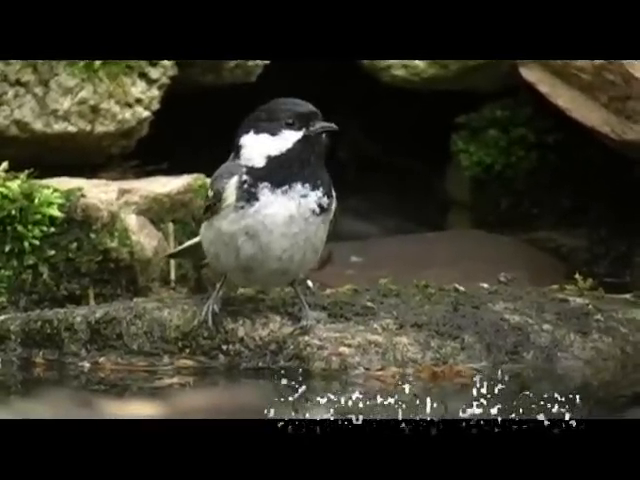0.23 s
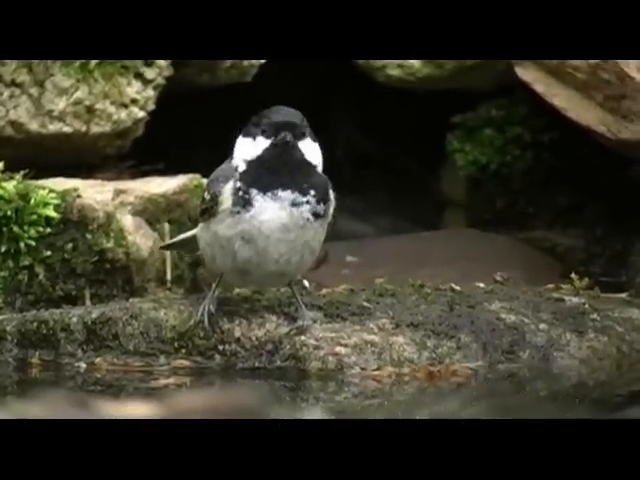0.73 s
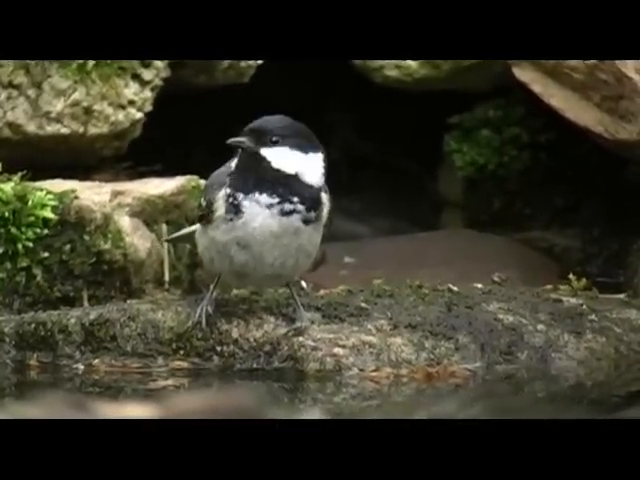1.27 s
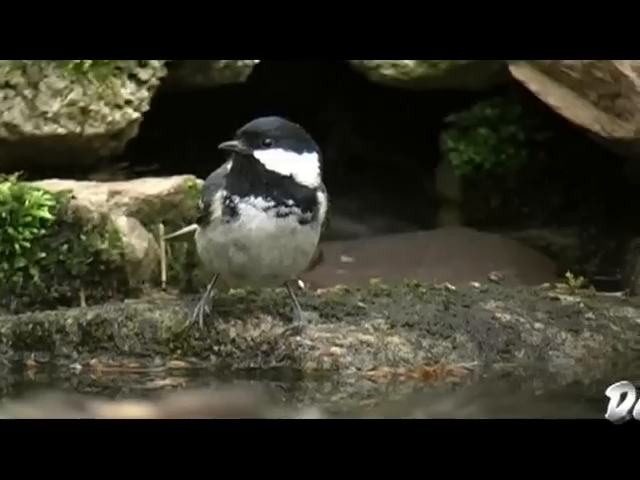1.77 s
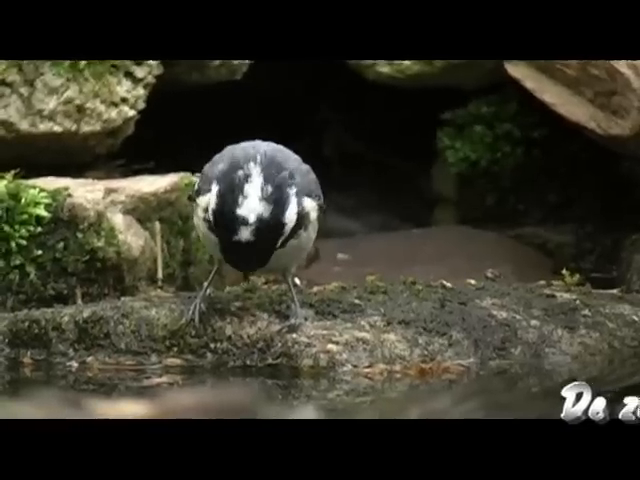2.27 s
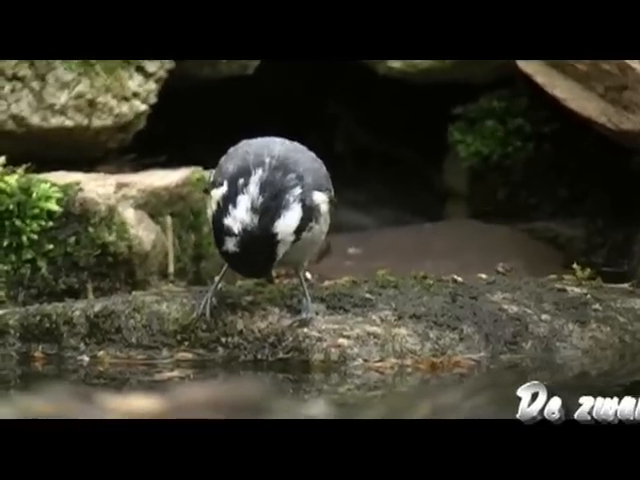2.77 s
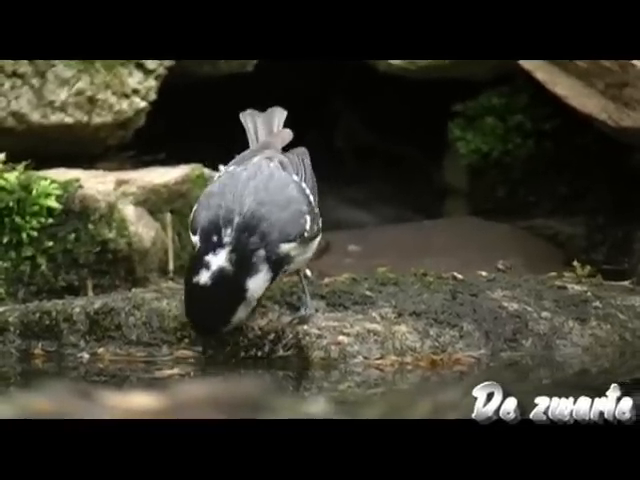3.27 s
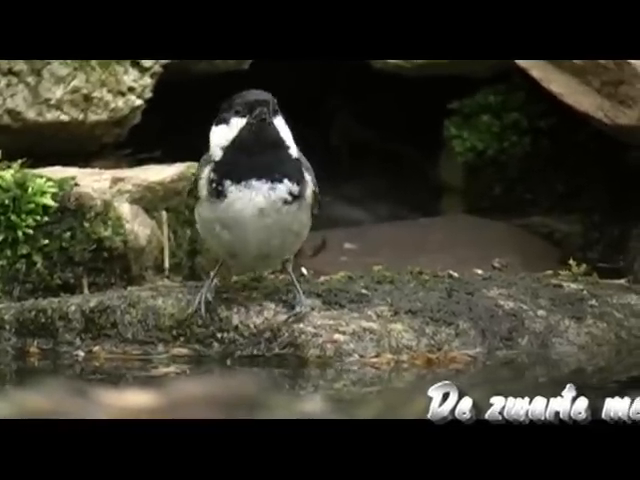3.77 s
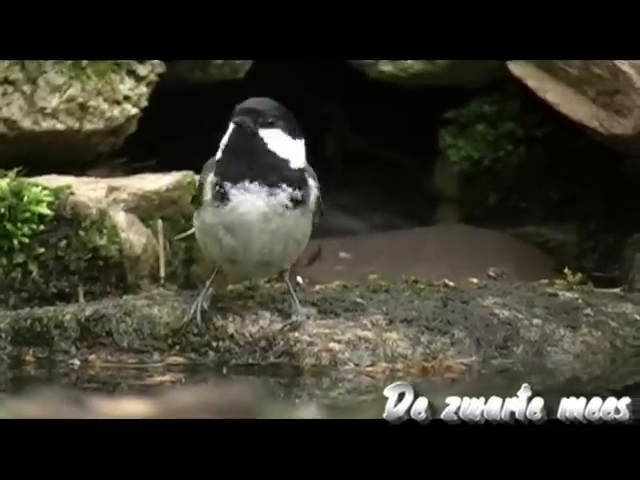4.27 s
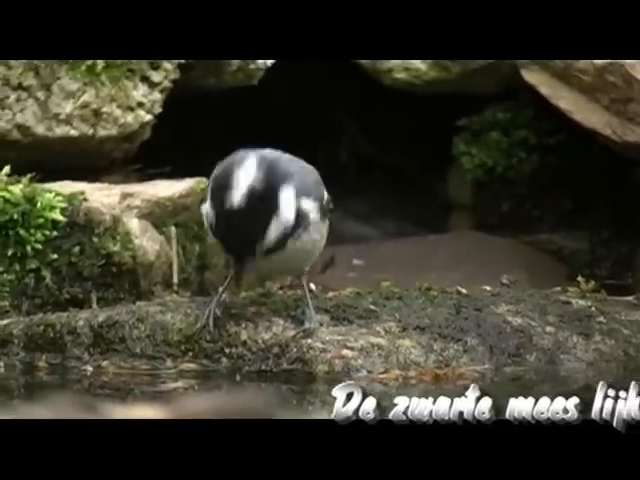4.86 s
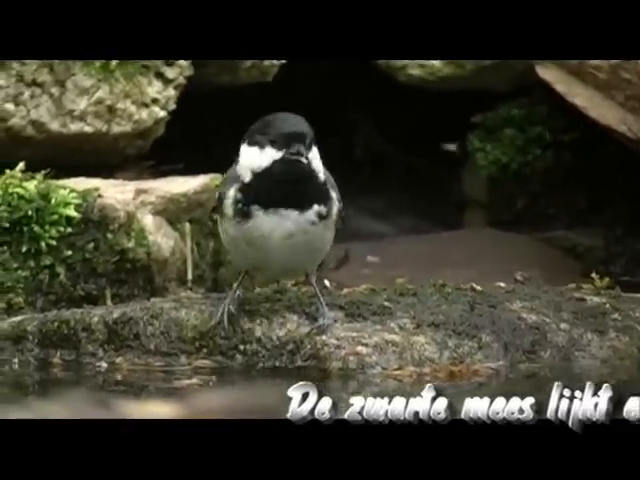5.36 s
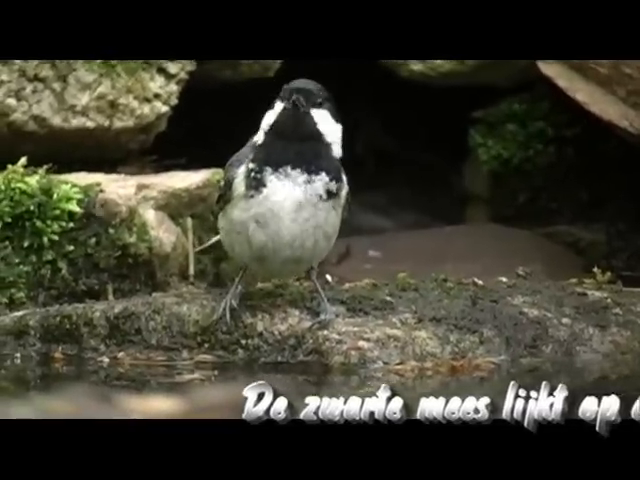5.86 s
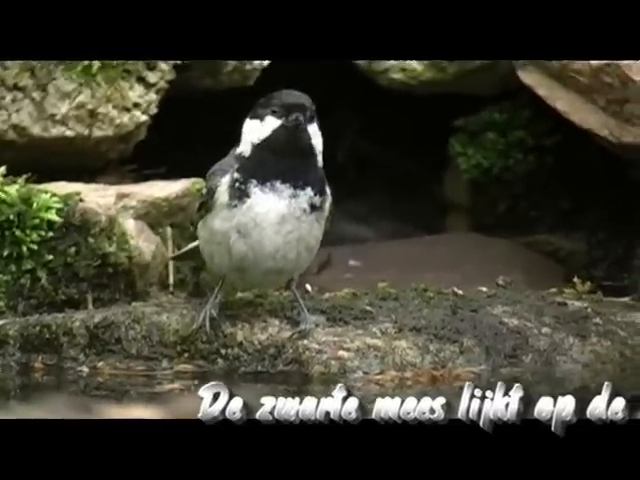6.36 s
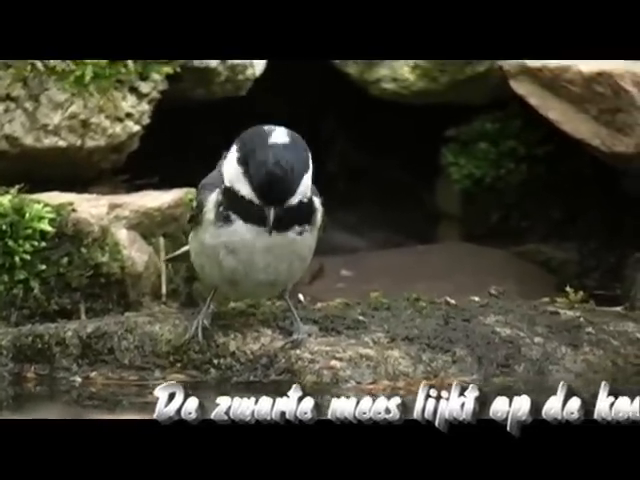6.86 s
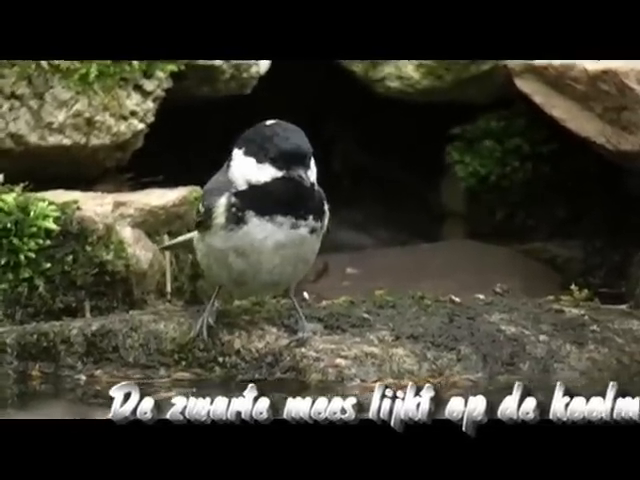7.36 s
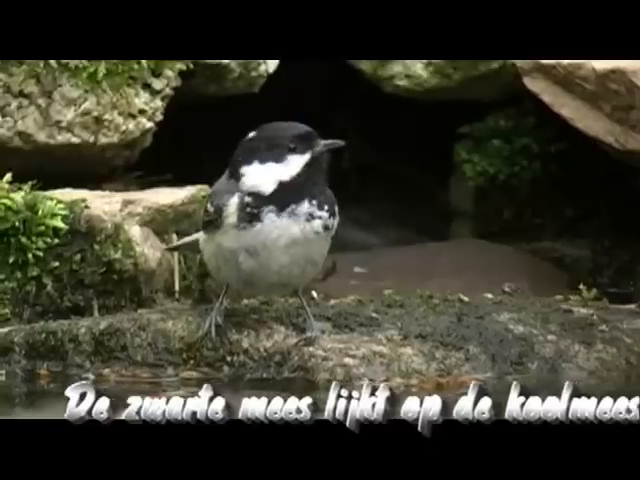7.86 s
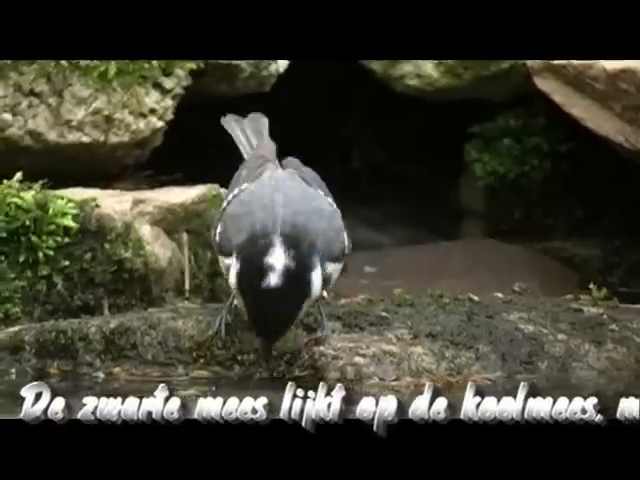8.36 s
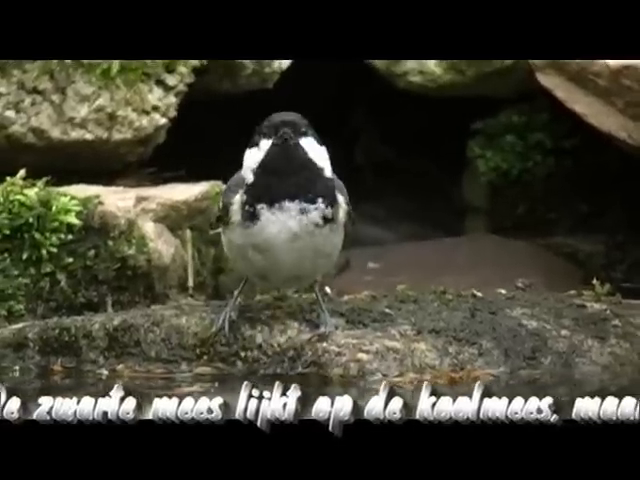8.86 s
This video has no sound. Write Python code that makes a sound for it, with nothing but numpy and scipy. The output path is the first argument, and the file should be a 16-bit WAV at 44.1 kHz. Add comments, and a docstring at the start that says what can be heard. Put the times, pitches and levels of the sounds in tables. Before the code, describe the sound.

Close, high two-note birdsong comes twice in a garden, amid fluty warbles, distant chirps, far traffic rumble and a steady motor hum.

```python
"""A coal tit sings close by in a garden: two runs of alternating low slurs and high whips, each note
repeated by a fading echo off a wall. A blackbird warbles, a chiffchaff calls and other small birds
chirp and trill further off, washed out by the trees. Every bird note is a tone gliding along a contour.
Under them lies a bed of far traffic rumble, steady motor hum and soft hiss; something knocks once."""
import sys
import numpy as np
from scipy import signal
from scipy.fft import rfft, irfft
from scipy.io import wavfile
from scipy.ndimage import uniform_filter1d

SR = 44100
rng = np.random.default_rng(int(sys.argv[2]) if len(sys.argv) > 2 else 0)


def pcm_store(signal):
    """Save signal as 16-bit PCM."""
    levels = np.round(np.clip(np.atleast_2d(signal), -1, 1) * 32767)
    wavfile.write(sys.argv[1], SR, levels.astype(np.int16).T)


N = 401751
TIME = np.arange(N) / SR


def gain_of(db):
    """Decibels to amplitude."""
    return 10 ** (np.asarray(db) / 20)


def curve_at(points, hz):
    """Reads a curve on a log-frequency axis."""
    point_hz, value = np.transpose(points)
    return np.interp(np.log(hz + 1), np.log(point_hz + 1), value)


def add(mix, start_s, sound):
    """Mixes a sound onto a track."""
    part = mix[max(round(start_s * SR), 0):][:len(sound)]
    part += sound[:len(part)]


def drift(t, hz):
    """A smooth random wobble of unit size, moving at rates up to hz."""
    rates = np.geomspace(hz / 4, hz, num=10)[:, None]
    return np.sin(2 * np.pi * (rates * t + rng.random(rates.shape))).sum(0) / np.sqrt(5)


def note(start_s, length_s, start_hz, middle_hz, end_hz, level_db, peak_at, *warble, fade_db):
    """A note's contour: pitch arcs; level and any warble peak at the fraction peak_at of its length."""
    progress = np.linspace(0, 1, num=25)
    arc = np.polyfit([0, .5, 1], [start_hz, middle_hz, end_hz], 2)
    peak_at = np.clip(peak_at, .02, .98)
    off_peak = np.maximum(1 - progress / peak_at, (progress - peak_at) / (1 - peak_at))
    shape_db = fade_db * off_peak ** 1.5
    contour = [start_s + length_s * progress, np.polyval(arc, progress), level_db + shape_db]
    return np.transpose(contour + [depth * gain_of(shape_db) for depth in warble])


def repeated(contours, cues):
    """The same notes sung again at each cue, at its own level."""
    return [c + np.array([s, 0, db, 0])[:c.shape[1]] for s, db in cues for c in contours]


def tone(contour, jitter, warble_rate_hz):
    """A sine gliding along rows of time, pitch, level and optional warble depth; gives start and sound."""
    times, *columns = np.transpose(contour)
    t = np.arange(times.min(), times.max(), 1 / SR)
    hz, db, *depth = (uniform_filter1d(np.interp(t, times, c), size=130) for c in columns)
    hz = hz * (1 + jitter * drift(t, 220))
    if depth:
        # the warble is uneven in speed and depth, and the level flutters with it
        rate_hz = warble_rate_hz * (1 + .15 * drift(t, 35))
        swing = np.sin(2 * np.pi * np.cumsum(rate_hz) / SR)
        hz = hz + depth[0] * swing * gain_of(-2 + 1.8 * drift(t, 40))
        db = db + 1.2 * drift(t, 55)
    fades = signal.windows.tukey(len(t), min(0.0023 * SR / len(t), 1))
    return t[0], np.sqrt(2) * gain_of(db) * fades * np.sin(2 * np.pi * np.cumsum(hz) / SR)


def phrase(contours, jitter, warble_rate_hz=0.):
    """All the notes of one voice on one track; more pitch jitter makes it hoarser."""
    track = np.zeros(N)
    for contour in contours:
        add(track, *tone(contour, jitter, warble_rate_hz))
    return track


def reverb(x, t60, spread, treble_share=0.067):
    """Reflections from stones and foliage: a dying cloud of taps, partly different left and right."""
    t = np.arange(SR) / SR
    taps = rng.choice([-1., 1.], (3, SR)) * (rng.random((3, SR)) < 1 / 10) * (t > .001)
    bright = signal.filtfilt(*signal.butter(2, 6300, "high", fs=SR), taps)
    # the air takes the high treble first
    taps = (taps - bright) * gain_of(-60 * t / t60) + bright * gain_of(-60 * t / (treble_share * t60))
    tails = taps[:2] * spread + taps[2]
    tails /= np.linalg.norm(tails, axis=1, keepdims=True)
    return signal.fftconvolve(x[None], tails, axes=1)[:, :N]


# how alike left and right are in the bed: frequency_hz, correlation
BED_CORRELATION = [(20, .5), (45, 0.87), (130, 0.88), (300, 1), (370, 0.5), (430, 0.7), (700, 0.26),
                   (1500, 0.01), (4500, 0.56), (9000, 0.46), (15000, 0.33)]
def noise_bed(spectrum):
    """Coloured stereo noise at unit rms, near mono in the bass and diffuse above."""
    hz = np.fft.rfftfreq(N, 1 / SR)
    left, other = rfft(rng.standard_normal((2, N)))
    alike = curve_at(BED_CORRELATION, hz)
    right = alike * left + np.sqrt(1 - alike ** 2) * other
    noise = irfft(np.array([left, right]) * gain_of(curve_at(spectrum, hz)), N)
    return noise / np.sqrt(np.mean(noise ** 2))


# EQ of the hiss: frequency_hz, gain_db
AIR_EQ = [(300, 5.5), (800, 2), (1500, 1.5), (2700, -1.5), (4500, -1), (6000, -4), (8000, -9),
          (11000, -9.5), (15500, -12.5)]
def air():
    """The soft, steady hiss of the open air."""
    return gain_of(-46.5) * noise_bed(AIR_EQ)


# EQ of the rumble: frequency_hz, gain_db
TRAFFIC_EQ = [(18, -28), (40, -5.5), (60, 3.5), (90, -5.5), (112, -4.5), (132, 7.5), (170, 3.5), (225, 2),
              (315, -8), (355, -1.5), (410, -9.5), (500, -7.5), (700, -16), (1500, -37.5)]
# vehicle pass-bys: peak_s, half_width_s, level_db
PASS_BYS = [(.1, 0.42, -50.5), (2.5, 0.88, -42.5), (3.65, 0.34, -39.5), (4.6, 0.3, -39.5),
            (5.75, 0.34, -47), (8.9, 0.92, -50.5)]
def traffic():
    """A far, steady rumble; each vehicle adds its power as it nears and leaves."""
    steady_power = gain_of(-48.5) ** 2
    passing_power = sum(gain_of(db) ** 2 * np.exp(-((TIME - s) / width) ** 2) for s, width, db in PASS_BYS)
    swell_db = 10 * np.log10(steady_power + passing_power)
    rumble = noise_bed(TRAFFIC_EQ)
    # the deep rumble comes from all around and swells less
    deep = signal.filtfilt(*signal.butter(2, 100, fs=SR), rumble)
    return gain_of(swell_db + 3.5) * (rumble - deep) + gain_of(-27 + 0.31 * swell_db) * deep


# hum and whine tones: pitch_hz, level_db, left_lead_rad
HUM_TONES = [(151.8, -34.5, 2.5), (610, -59, 3.5), (15623, -81, -5)]
def motor_hum():
    """A steady motor hum and a thin electrical whine, wavering slightly in phase."""
    hum = np.zeros((2, N))
    for hz, db, left_lead in HUM_TONES:
        phase = 2 * np.pi * hz * TIME + .06 * drift(TIME, 3.1)
        hum += np.sqrt(2) * gain_of(db) * np.sin([phase + left_lead, phase])
    return hum


# engine drones: start_s, length_s, start_hz, middle_hz, end_hz, level_db, peak_at
ENGINE_DRONES = [(1.1, 1.45, 225, 258, 316, -43, 0.5), (2.05, 1.27, 140.1, 142.3, 145, -35, 0.3),
                 (2.8, 1.53, 142.1, 156.8, 148.4, -37, 0.5), (4.55, 1.19, 143.6, 141, 137.9, -36.5, 0.6),
                 (8.15, 0.77, 134.2, 132.6, 136.7, -42, 0)]
def far_engines():
    """Rough drones that swell and fade; the low ones beat with the hum."""
    return gain_of(-4.5) * phrase([note(*row, fade_db=-5.5) for row in ENGINE_DRONES], jitter=0.11)


# ring of the wood: pitch_hz, level_db, t60_s
WOOD_MODES = [(413, -20, 0.03), (497, -35, 0.037), (915, -33, .03), (1300, -35, 0.032), (1560, -32, 0.02)]
def knock():
    """A dull double contact on wood, with two faint bounces."""
    t = np.arange(SR // 5) / SR
    ring = sum(gain_of(db - 60 * t / t60) * np.sin(2 * np.pi * hz * t) for hz, db, t60 in WOOD_MODES)
    ring *= 1 - np.exp(-(t / 0.00053) ** 2)  # a soft contact
    hits = np.zeros(N)
    for start_s, level_db in [(6.2092, -15), (6.2125, 0.5), (6.228, -26), (6.247, -14.5)]:
        add(hits, start_s, gain_of(level_db) * ring)
    return hits + gain_of(-9) * reverb(hits, t60=0.075, spread=2.4)


# one burst of twitter: offset_s, length_s, start_hz, middle_hz, end_hz, level_db, peak_at
TWITTER_NOTES = [(0.0047, 0.076, 2900, 4100, 5000, -39.5, .8), (0.057, .11, 4550, 4350, 4150, -37.5, .15),
                 (0.0087, .06, 5600, 2800, 6400, -44, 0), (.06, 0.037, 6980, 6900, 6780, -37, 0.4),
                 (0.12, 0.043, 6550, 6500, 6400, -45, 0.8)]
# its two cues: start_s, level_db
TWITTER_CUES = [(4.495, -1), (4.733, -8.5)]
# single chirps and scratchy notes: start_s, length_s, start_hz, middle_hz, end_hz, level_db, peak_at
CHIRP_NOTES = [(2.225, 0.101, 3100, 4220, 4200, -52, 0.13), (2.193, 0.074, 2600, 3270, 3200, -63, .45),
               (5.23, 0.15, 3000, 3920, 5100, -42.5, 0.96), (6.017, 0.05, 4500, 4150, 3800, -48.5, 0.4),
               (5.223, .13, 2400, 2100, 1850, -60, 0), (5.772, 0.64, 2240, 2120, 2100, -64, 0),
               (8.582, 0.061, 4230, 4500, 4490, -49.5, .5), (8.583, 0.0677, 3620, 3500, 3400, -52, 0.3),
               (8.872, 0.073, 2750, 2700, 4000, -53.5, 0), (8.932, 0.044, 5230, 5260, 5200, -53, 0)]
SCRATCH_NOTES = [(.3, .1, 4190, 3900, 3700, -49, 0), (1.396, .6, 5310, 5110, 4740, -48, 0.52),
                 (2.177, 0.088, 4470, 3760, 3270, -38.5, 0), (3.991, 0.35, 3494, 3200, 3365, -41, 0.24),
                 (4.355, .55, 3294, 3296, 2890, -40, 0.18), (4.484, .16, 5010, 5530, 5380, -32, 0),
                 (4.754, 0.14, 5190, 5280, 5080, -36, 0), (4.496, .18, 9900, 10300, 10400, -45, .45),
                 (4.76, .17, 10400, 10600, 10600, -59, .5), (8.299, .25, 4340, 3820, 2960, -43.5, 0),
                 (8.6, 0.44, 3300, 3430, 3560, -46.5, 0.62)]
def far_birds():
    """Slightly hoarse twitters and chirps and very hoarse scratches, smeared by the trees."""
    twitter = repeated([note(*row, fade_db=-8.5) for row in TWITTER_NOTES], TWITTER_CUES)
    chirps = [note(*row, fade_db=-8.5) for row in CHIRP_NOTES]
    song = phrase(twitter + chirps, jitter=.013)
    scratches = phrase([note(*row, fade_db=-12) for row in SCRATCH_NOTES], jitter=0.11)
    wet_song = gain_of(-8.5) * song + reverb(song, t60=.7, spread=.28)
    return gain_of(4) * wet_song + gain_of(-4) * reverb(scratches, t60=1.0, spread=0.54)


# thin whistles: start_s, length_s, start_hz, middle_hz, end_hz, level_db, peak_at
WHISTLE_NOTES = [(0, 0.028, 8220, 8100, 7800, -43, 0), (0.05, .05, 7980, 8180, 8050, -48, 0.4),
                 (0.14, .05, 7850, 8080, 8100, -57, .5), (0.057, .055, 6500, 4630, 3700, -54, 0.8),
                 (.825, .065, 7140, 7720, 7100, -60, .6), (1.0, 0.12, 3410, 3490, 3520, -53.5, 0.15),
                 (1.153, 0.21, 3490, 3640, 3630, -54.5, 0), (.83, .09, 4900, 4950, 5000, -62, .5),
                 (1.3, 0.12, 5180, 5050, 4800, -58, .6), (7.049, 0.072, 3170, 3180, 3280, -52.5, 0.8),
                 (7.665, 0.13, 3990, 3990, 3945, -40.5, 1), (9.003, 0.025, 3290, 3620, 3030, -44.5, 0.95),
                 (9.08, 0.039, 3170, 3470, 3700, -48, 0.9)]
# trills: start_s, level_db
TRILL_CUES = [(7.941, -43), (8.14, -44.5), (8.343, -45)]
def small_birds():
    """Nearer birds: thin whistles, and trills of tiny falling slurs, each run led by an upward slur."""
    song = phrase([note(*row, fade_db=-15) for row in WHISTLE_NOTES], jitter=0.0054)
    trill_rate_hz = 78
    for s, db in TRILL_CUES:
        lead_in = [(s - .04, 3350, db - 10), (s - .02, 3750, db), (s, 4200, db + 0.5)]
        slurs = [[(at, 3600, db - 20), (at + 0.005, 3250, db + 3.5), (at + 0.011, 3000, db - 16)]
                 for at in s + np.arange(9) / trill_rate_hz]
        song += phrase([lead_in], jitter=0.025) + phrase(slurs, jitter=0.024)
    return gain_of(5) * song + gain_of(-4) * reverb(song, t60=0.7, spread=0.37)


def plunge(start_s, length_s, top_hz, held_hz, fall_s, level_db):
    """The contour of a note that drops onto a held pitch, growing as it lands and fading as it is held."""
    t = np.linspace(0, length_s, num=40)
    height = np.exp(-t / fall_s)
    shape_db = -10 * height ** 2 - 7 * t / length_s
    return np.transpose([start_s + t, held_hz + (top_hz - held_hz) * height, level_db + shape_db])


# two-step "chiff" and one-step "chaff": offset_s, length_s, top_hz, held_hz, fall_s, level_db
CHIFF_STEPS = [(0, 0.063, 7400, 5287, .007, 0), (0.04, 0.062, 5360, 3522, .018, -0.5)]
CHAFF_STEPS = [(0, .115, 7600, 4550, .0055, 0)]
# their cues: start_s, level_db
CHIFF_CUES = [(.04, -63), (0.259, -63), (2.175, -50.5), (3.542, -48.5), (4.24, -38), (4.875, -38),
              (5.562, -40), (6.264, -38.5), (6.87, -56)]
CHAFF_CUES = [(3.86, -40), (5.228, -39.5), (5.926, -38), (6.59, -52)]
def chiffchaff():
    """Plunging notes at an easy pace, washed out by the trees."""
    notes = repeated([plunge(*row) for row in CHIFF_STEPS], CHIFF_CUES)
    notes += repeated([plunge(*row) for row in CHAFF_STEPS], CHAFF_CUES)
    direct = phrase(notes, jitter=.005)
    smeared = phrase(notes, jitter=.022)  # stirring leaves smear the pitch of what they throw back
    return gain_of(-1.5) * direct + gain_of(5) * reverb(smeared, t60=0.98, spread=0.13)


# opening motif: offset_s, length_s, start_hz, middle_hz, end_hz, level_db, peak_at, warble_depth_hz
MOTIF_NOTES = [(0, 0.055, 2560, 2104, 1410, -42, 0.6, 0), (0.15, 0.079, 1780, 1894, 1960, -35, 1, 0),
               (0.238, 0.0675, 2235, 2215, 2450, -35, .7, 2),
               (.39, .14, 2385, 2080, 1894, -27.5, 0.81, 126), (0.528, .08, 1800, 1727, 1610, -34.5, 0, 38)]
# its two cues: start_s, level_db
MOTIF_CUES = [(1.819, -2), (8.429, 0)]
# flourish: start_s, length_s, start_hz, middle_hz, end_hz, level_db, peak_at, warble_depth_hz
FLOURISH_NOTES = [(2.509, 0.057, 1430, 1557, 1660, -42.5, 1, 0),
                  (2.568, 0.095, 2050, 2183, 1780, -31, .3, 400),
                  (2.665, .045, 1730, 1656, 1640, -37, 0.32, 40),
                  (2.715, .128, 1764, 2034, 1900, -28, 0.47, 122),
                  (2.862, 0.052, 2364, 2090, 1800, -25.5, 0.16, -10),
                  (2.9, 0.092, 1860, 1792, 1730, -33.5, 0, -3),
                  (3.202, 0.073, 2230, 2810, 3550, -40, .2, 13),
                  (3.22, .085, 1334, 1612, 1654, -43, .95, 2),
                  (3.293, 0.21, 1660, 1704, 1610, -34, 0.11, 40.5),
                  (3.458, .26, 1620, 1455, 1382, -36, 0.17, 23),
                  (3.52, 0.23, 3100, 2920, 2780, -52.5, .8, 0),
                  (3.905, 0.069, 1780, 1604, 1290, -34.5, 0, 66)]
# buzz voices: the flourish's columns, then warble_rate_hz
BUZZ_NOTES = [(3.745, .17, 1650, 1720, 1580, -36.5, 0.5, 390, 94),
              (3.75, .22, 2400, 2470, 2370, -45, 0.4, 75, 76),
              (4.09, .08, 3300, 2350, 1900, -41.5, .2, 330, 87),
              (4.17, .28, 2130, 2270, 2280, -42.5, 0.4, 200, 29),
              (4.11, .33, 1760, 1570, 1420, -42.5, 0.93, 150, 31)]
def blackbird():
    """A fluty motif, a warbled flourish, harsh two-voiced buzzes in uneven pulses, the motif again."""
    motifs = repeated([note(*row, fade_db=-11.5) for row in MOTIF_NOTES], MOTIF_CUES)
    flourish = [note(*row, fade_db=-6.5) for row in FLOURISH_NOTES]
    buzzes = sum(phrase([note(*row, fade_db=-3)], jitter=.025, warble_rate_hz=rate)
                 for *row, rate in BUZZ_NOTES)
    flutes = phrase(motifs + flourish, jitter=.006, warble_rate_hz=51.55)
    pulsing = gain_of(-1.5 + 2 * drift(TIME, 38))
    song = flutes + pulsing * buzzes
    pan = gain_of([[-.8], [.6]])
    return (gain_of(-1) * song + gain_of(-10) * reverb(song, t60=.42, spread=2.5)) * pan


# EQ of the wall's echo: frequency_hz, gain_db
WALL_EQ = [(3500, -14), (4500, -15), (5000, -6), (5700, 0), (6800, -2), (8000, -10)]
def wall_echo(song, delay_s):
    """Three evenly spaced, fading repeats, coloured and blurred by a rough wall."""
    repeats = np.zeros(N)
    for bounce, level_db in enumerate([-15, -24, -33], start=1):
        add(repeats, bounce * delay_s, gain_of(level_db) * song)
    eq = gain_of(curve_at(WALL_EQ, np.fft.rfftfreq(2 * N, 1 / SR)))
    repeats = irfft(rfft(repeats, 2 * N) * eq)[:N]
    return repeats + gain_of(-7) * reverb(repeats, t60=.07, spread=.3)


# note shapes: offset_s, pitch_hz, level_db
LOW_SLUR = [(-.021, 8500, -42), (-.016, 7300, -27), (-.01, 6200, -11), (-.005, 5600, -5), (0, 5300, -1),
            (.01, 4990, 0), (.02, 4760, 1), (.03, 4590, .5), (.04, 4520, -2), (.045, 4510, -5),
            (.049, 4520, -35)]  # a falling slur
HIGH_WHIP = [(-.06, 3400, -40), (-.057, 3550, -24), (-.05, 4300, -19), (-.047, 5100, -7),
             (-.042, 7300, -20), (-.037, 8400, -35), (-.028, 8650, -35), (-.018, 8200, -29),
             (-.011, 7350, -13.5), (0, 5900, -3.5), (.006, 5560, -2), (.018, 5390, 1), (.03, 5330, -.8),
             (.04, 5410, -2.5), (.045, 5440, -30)]  # whips upward, then falls to a held pitch
WHIP_SECOND_VOICE = [(-.062, 5900, -35), (-.056, 6600, -18), (-.05, 7400, -27), (-.044, 8900, -43)]  # the other side of the syrinx joins as the whip starts
# cues for the low and high notes: time_s, level_db, pitch_ratio, length_ratio
LOW_CUES = [(2.501, -25.5, 1.01, 1), (2.795, -19, 0.98, 1.1), (3.083, -15.5, 0.99, 1.13),
            (3.369, -16, 0.98, 1.14), (3.665, -17.5, 1, 1.1), (3.959, -16, 1, 0.98), (6.433, -22, 1, 0.99),
            (6.726, -16, 0.99, 1.09), (7.01, -14, 1.009, 1.04), (7.3, -13, 1, 1),
            (7.593, -16.5, 0.99, 1.11), (7.893, -15, 1.002, 1.06)]
HIGH_CUES = [(2.672, -20.3, 1.006, 1.04), (2.957, -18.8, 0.995, 1.12), (3.247, -15.6, 1.007, 0.99),
             (3.54, -18.6, 1.0, 1.11), (3.834, -19.4, 1.029, 1.03), (4.123, -16.5, 1.003, 0.93),
             (6.606, -17.6, 1.006, 1.0), (6.891, -14.6, 1.002, 1.03), (7.175, -13.6, 1.001, 0.99),
             (7.464, -13.9, 0.996, 1.02), (7.765, -14.9, 1.002, 1.03), (8.057, -16.6, 1.01, 1.08)]
# how strongly the voice carries to the wall and the trees: time_s, gain_db
SEND_LEVEL = [(2.6, 3.5), (4.15, 6), (6.5, 2), (8.1, 2.5)]
def coal_tit():
    """Two learned note shapes, each time a little different in pitch, length and strength."""
    song = np.zeros(N)
    for cues, shape in ((LOW_CUES, LOW_SLUR), (HIGH_CUES, HIGH_WHIP), (HIGH_CUES, WHIP_SECOND_VOICE)):
        notes = [np.array(shape) * (length, pitch, 1) + (s, 0, db) for s, db, pitch, length in cues]
        song += phrase(notes, jitter=0.0061)
    send = song * gain_of(np.interp(TIME, *np.transpose(SEND_LEVEL)))
    echo = wall_echo(send, delay_s=.158)
    # the bird turns its head, so the nearby reflections keep changing
    head_angle = 2 * np.pi * 0.427 * TIME
    near = sum(reverb(song * aim, t60=.11, spread=.25, treble_share=.9)
               for aim in (np.cos(head_angle), np.sin(head_angle)))
    trees = reverb(send, t60=0.77, spread=0.22, treble_share=0.66)
    pan = gain_of([[-.6], [.1]])
    return (song + echo + gain_of(-11.5) * near + gain_of(-16) * trees) * pan


def scene():
    """The garden in stereo: birds over a bed that leans slightly right."""
    birds = coal_tit() + blackbird() + chiffchaff() + far_birds() + small_birds()
    bed_pan = gain_of([[-.6], [.6]])
    bed = traffic() * bed_pan + far_engines() + air() * bed_pan + motor_hum()
    return birds + bed + knock()


def record(dry):
    """A steep low-pass trims the very top of the mix."""
    low_pass = signal.firwin(511, cutoff=15850, window=("kaiser", 9), fs=SR)
    return signal.oaconvolve(dry, low_pass[None], "same")


dry = scene()
out = record(dry)
pcm_store(out)
```